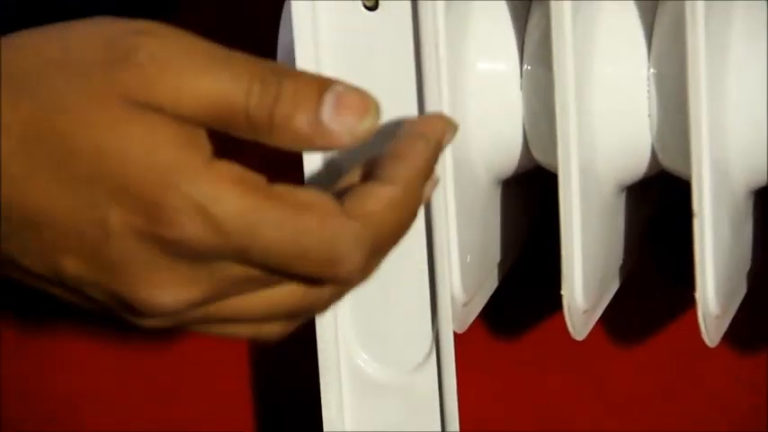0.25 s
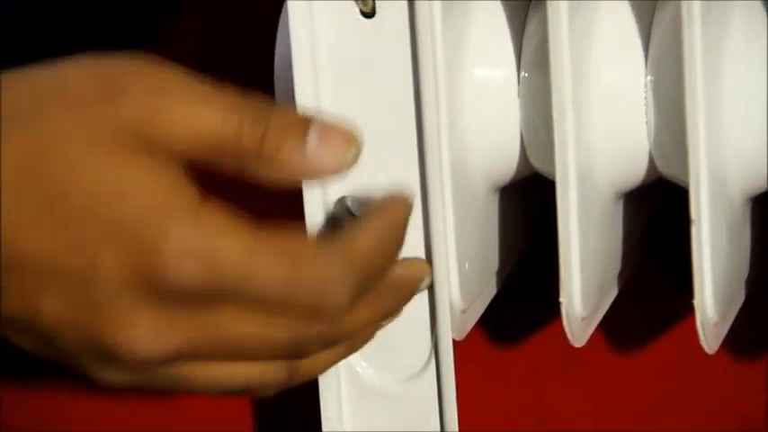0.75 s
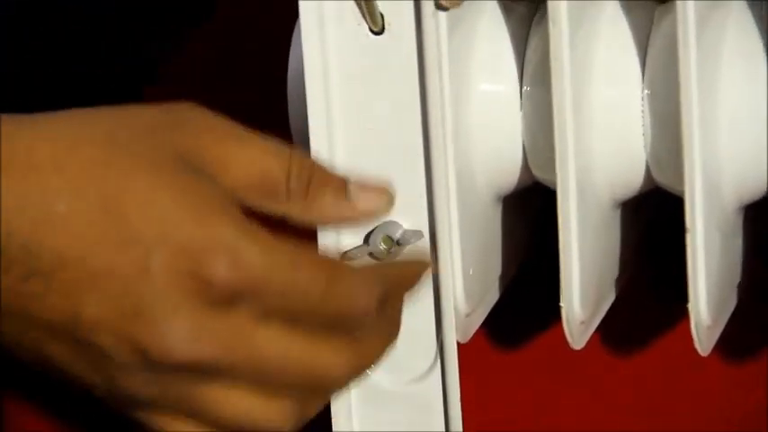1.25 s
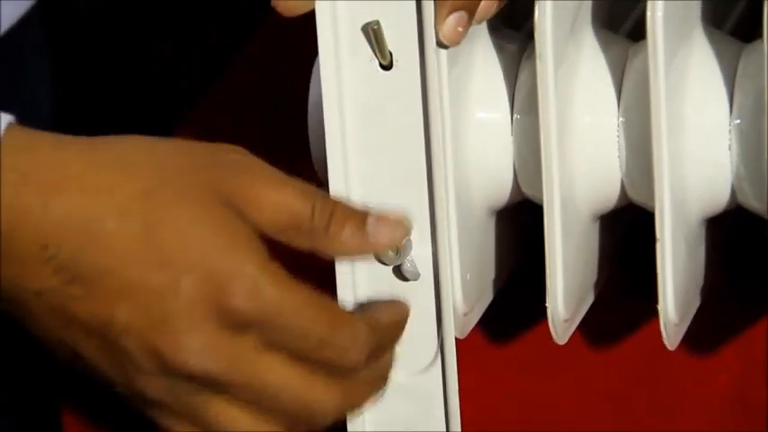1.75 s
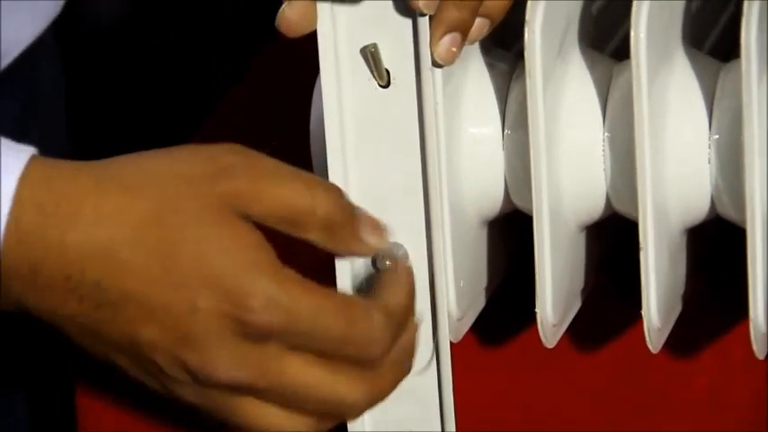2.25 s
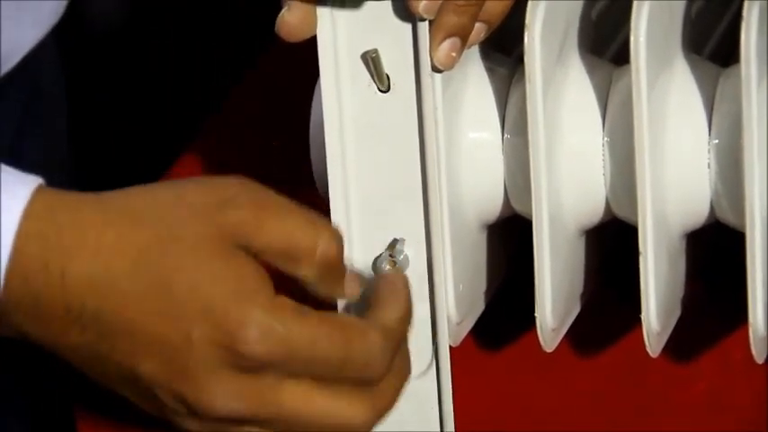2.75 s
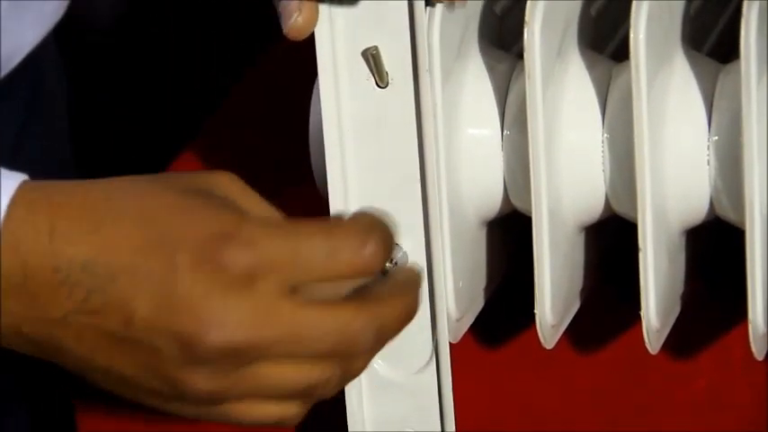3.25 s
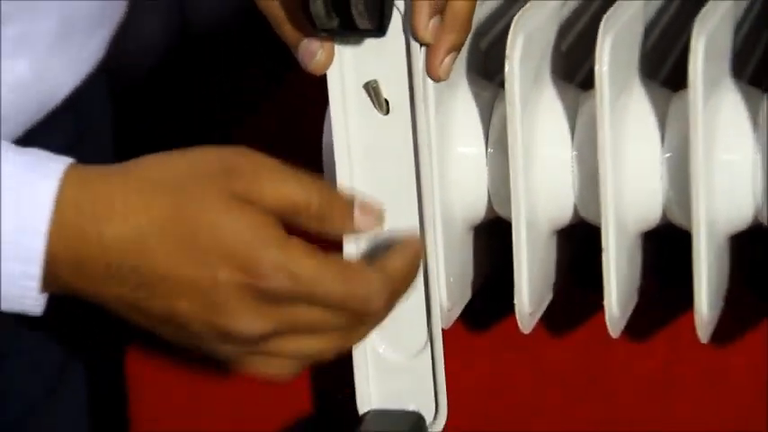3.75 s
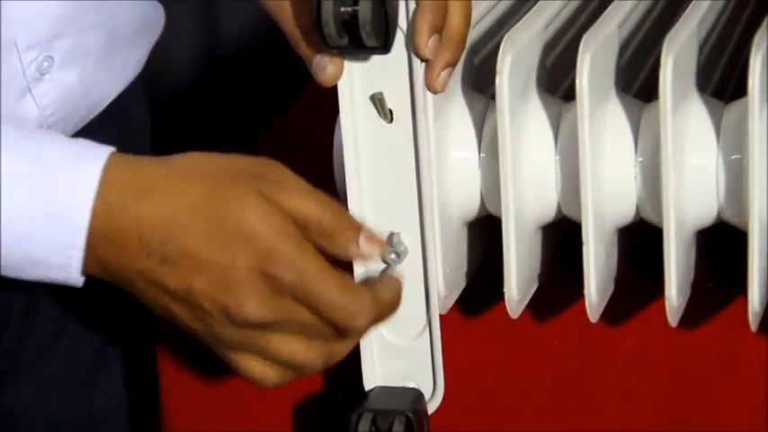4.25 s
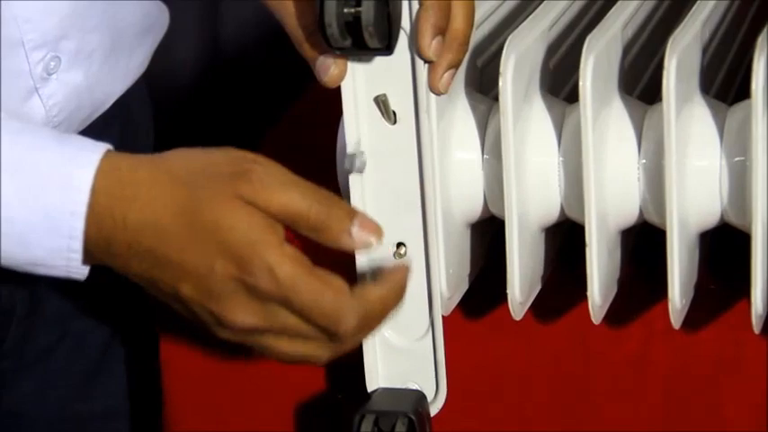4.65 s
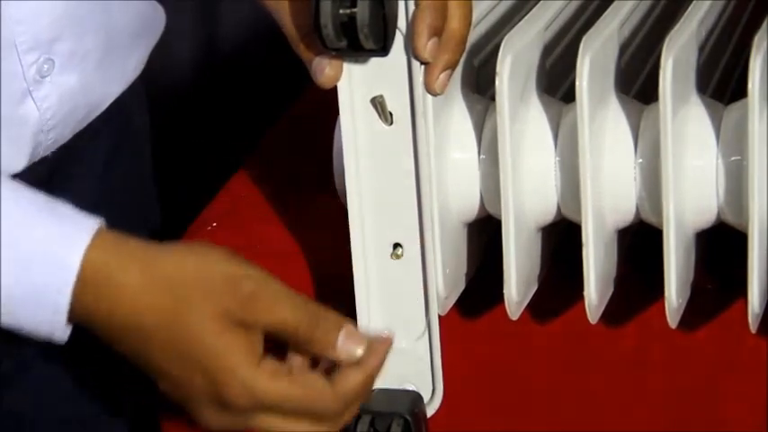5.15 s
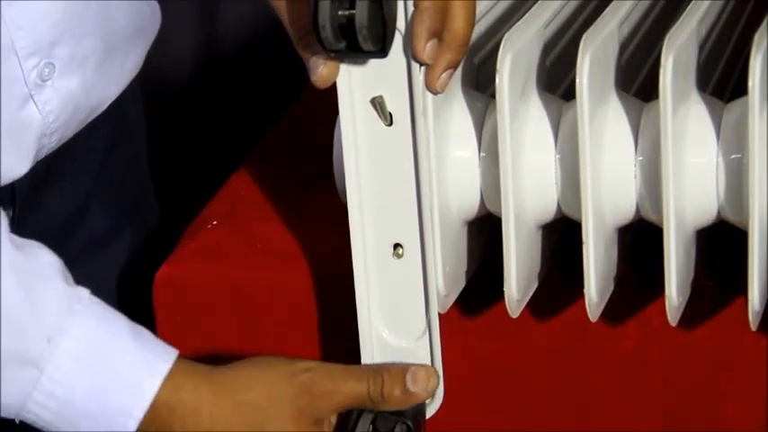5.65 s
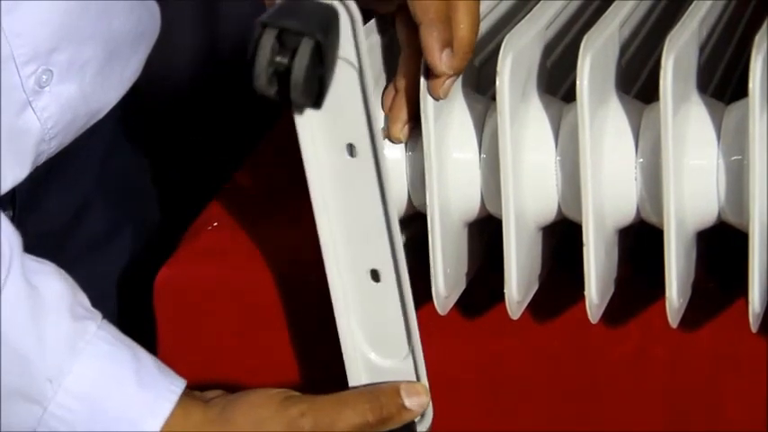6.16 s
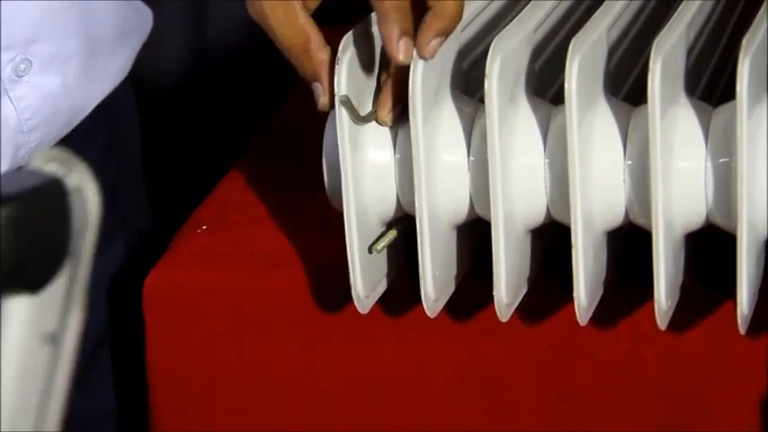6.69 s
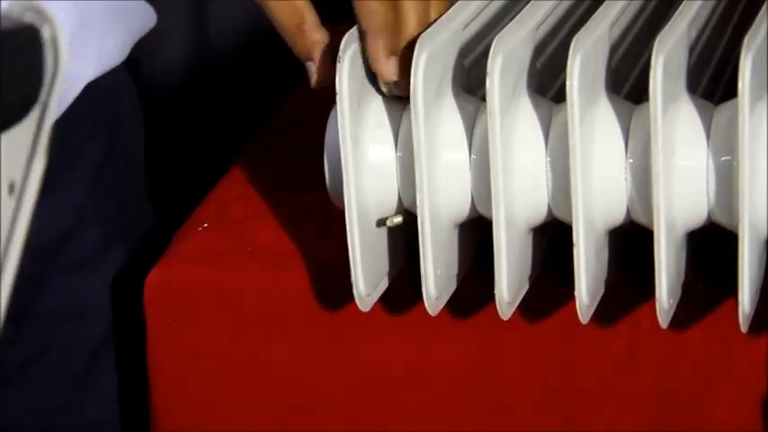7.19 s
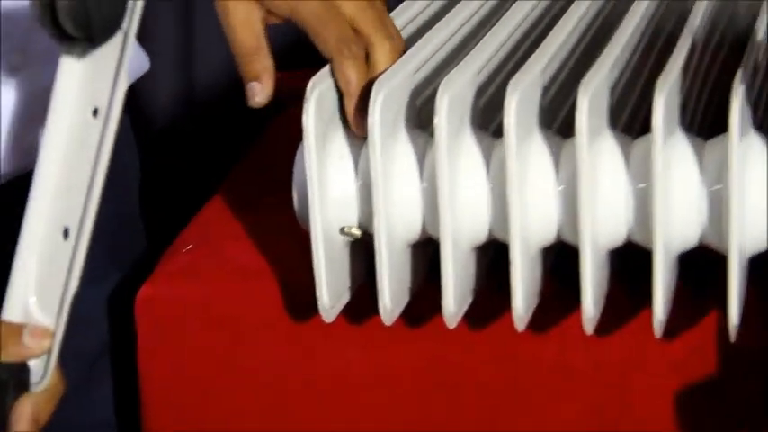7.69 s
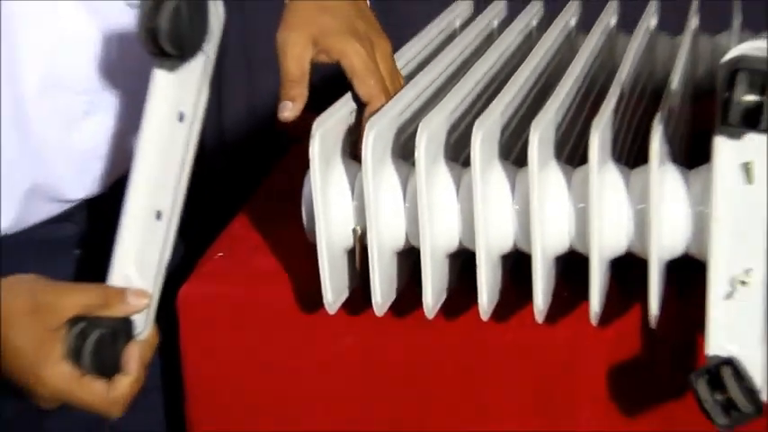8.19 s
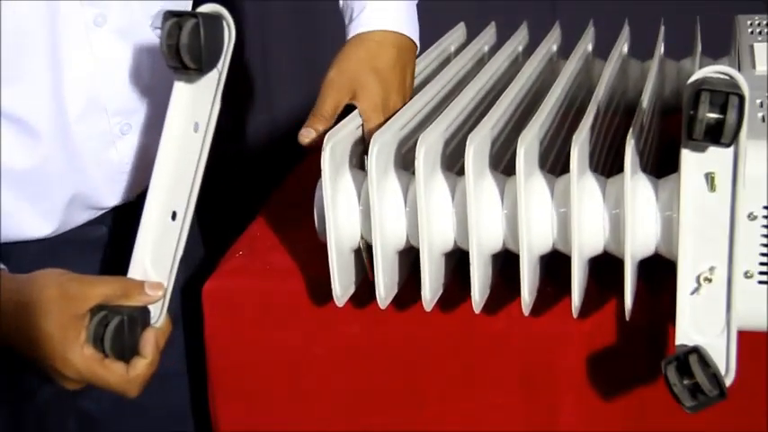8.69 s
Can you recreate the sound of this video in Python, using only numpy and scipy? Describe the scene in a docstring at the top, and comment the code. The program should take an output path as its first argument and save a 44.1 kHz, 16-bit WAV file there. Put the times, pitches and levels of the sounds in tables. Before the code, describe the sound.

Fingers spin a small metal nut along its thread: uneven, crisp tinny clicks with tiny rebounds, little bass, and soft low bumps of the radiator. It comes off with a sharp hiss-like rasp. Then a plate clacks and scrapes loose, cloth rustles, close dry knocks sound, and a hook strikes hollow steel fins. Close microphone, faint room noise, short indoor reverberation.

```python
"""In a small room, a wing nut is flicked round and off the hook bolt on the wheel plate of an oil-filled radiator.
Each flick makes the loose nut click on thread and plate: a noise crack, a noise shimmer and decaying sine modes.
The plate slides off and the freed hook clatters between the steel fins, built from blows and grainy scrapes.
A few dry knocks sound close by. Soft bumps, squeals, skin hisses, noise swells, still air and reverberation fill in."""
import sys
import numpy as np
from scipy import signal
from scipy.fft import rfft, irfft, next_fast_len
from scipy.io import wavfile
from scipy.ndimage import uniform_filter1d

SR = 44100
rng = np.random.default_rng(int(sys.argv[2]) if len(sys.argv) > 2 else 0)


def dump(signal):
    """Clip the signal to [-1, 1] and save it as 16-bit WAV at the path in sys.argv[1]."""
    limited = np.clip(np.atleast_2d(signal).T, -1, 1)
    pcm = np.round(limited * 32767).astype(np.int16)
    wavfile.write(sys.argv[1], SR, pcm)


N = 393813
CLOCK = np.arange(N) / SR        # time in the whole scene, s
AGE = np.arange(16384) / SR      # time since one blow, s

# a finger flicks the nut round: [t/s, level/dB, brightness/(dB per octave), f/Hz that the contact favours,
# first touch to blow/s, time between rebounds/s, loss at the first rebound/dB]
FLICKS = [(0.1986, -23, -2.5, 1300, 0.0021, .027, 15), (0.4909, -15, -0.2, 2090, 0.0063, .0087, -0.5),
          (0.7513, -13.5, 0.5, 5270, 0.015, .012, 10.5), (1.0984, -16, 2.6, 7030, 0.0034, .01, 27),
          (1.309, -14.5, -0.5, 2360, 0.0091, 0.019, 1), (1.5669, -14, 1, 2080, 0.00096, .028, 8),
          (1.8493, -17, 0, 1270, 0.019, .01, 17), (2.1192, -13.5, -0.1, 2270, 0.025, 0.027, 5),
          (2.4056, -12.5, 0.5, 2410, 0.024, .01, 19), (2.658, -11, 0.7, 2230, .02, .0096, 5),
          (2.9033, -15, 0.8, 2140, 0.0018, .01, 33), (3.2508, -22.5, 0.5, 8400, 0.00083, .01, 11),
          (3.5135, -18.5, 1.5, 1600, .005, .01, 15), (3.5683, -15.5, 0.5, 8000, 0.024, .01, 31),
          (3.8073, -16.5, 2, 5900, .0126, .021, 16), (4.328, -16, 2.5, 10100, 0.033, 0.0055, 5.5),
          (4.5739, -19, 1.5, 4300, 0.017, 0.0043, -0.5), (4.8339, -17.5, 1.4, 4470, .026, .017, 5)]
# colour of skin and cloth noise: [f/Hz, level/dB]
CLOTH_COLOUR = [(300, -9), (1000, 5.5), (6000, -2.5), (13000, -7.5), (16000, -26)]
# against a firm blow, harder ones are brighter (dB per octave, per dB) and ring less for their level (dB per dB)
FIRM_DB, BRIGHTER_PER_DB, RING_LOSS_PER_DB = -18.5, 0.2656, 0.1466


def from_db(db):
    """Turn decibels into gain."""
    return 10 ** (np.asarray(db) / 20)


def rms_one(x):
    """Scale to unit rms, the usual measure of average strength."""
    return x / np.sqrt(np.mean(x ** 2) + 1e-20)


def attack_one(x, count=353):
    """Scale so that the first 8 ms have unit rms."""
    return x / np.sqrt(np.mean(x[:count] ** 2) + 1e-20)


def at_hz(points, hz):
    """Read a table on a log-frequency axis, as hearing spaces pitch."""
    points = np.array(points)
    return np.interp(np.log(hz + 1), np.log(points[:, 0]), points[:, 1])


def fade(t60, age=AGE):
    """Die away exponentially: 60 dB down after t60 seconds."""
    return np.exp(-np.log(1000) * age / t60)


def add(track, s, sound):
    """Mix a sound into a track at time s."""
    start = max(round(s * SR), 0)
    track[start:start + len(sound)] += sound[:N - start]


def level(curve):
    """Gain that follows a curve of [t/s, level/dB], silent outside it."""
    return from_db(np.interp(CLOCK, *np.transpose(curve), left=-np.inf, right=-np.inf))


def swells(rows):
    """Gain of soft strokes that rise and fall evenly about their moments: [t/s, level/dB, width/s]."""
    return sum(from_db(db) * np.exp(-2 * ((CLOCK - s) / width) ** 2) for s, db, width in rows)


def dying(rows):
    """Gain of sounds that start at once and die away: [t/s, level/dB, t60/s]."""
    return sum(from_db(db) * fade(t60, np.abs(CLOCK - s)) * (CLOCK >= s) for s, db, t60 in rows)


def high_pass(x, hz):
    """Small steel parts radiate little bass."""
    return signal.sosfilt(signal.butter(2, hz, "high", fs=SR, output="sos"), x)


def favour(hz, favoured_hz, boost_db, octaves):
    """Boost in dB of the frequencies that one point of contact drives best."""
    distance = np.log2((hz + 1) / favoured_hz) / octaves
    return boost_db * np.exp(-.5 * distance ** 2)


def coloured(x, spectrum, tilt_db=0, peaks=()):
    """Filter by a spectrum, a tilt in dB per octave and peaks of (Hz, dB, octaves), with no sound before its cause."""
    size = next_fast_len(len(x), True)
    hz = np.fft.rfftfreq(size, 1 / SR)
    db = at_hz(spectrum, hz) + tilt_db * np.log2(np.clip(hz, 700, 14000) / 3000)
    db = db + sum(favour(hz, *peak) for peak in peaks)
    # folding the cepstrum gives the minimum-phase filter, which reacts as early as possible
    cepstrum = irfft(np.log(from_db(db)), size)
    cepstrum[1:size // 2] *= 2
    cepstrum[size // 2 + 1:] = 0
    response = np.exp(rfft(cepstrum))
    return irfft(rfft(x, size) * response, size)[:len(x)]


def resonant(spectrum, modes, lift_db, width_hz):
    """Lift a part's spectrum round each of its clear modes."""
    hz = np.geomspace(40, 18000, 1200)
    distance = (hz[:, None] - np.array(modes)[:, 0]) / width_hz
    nearness = np.exp(-.5 * distance ** 2).max(axis=1)
    return np.column_stack([hz, at_hz(spectrum, hz) + lift_db * nearness])


def ringing(modes, tilt_db=0, favoured_hz=None, spread_db=3.0):
    """Sum dying sines; each blow weights the modes anew, and the grip shifts their pitch a little."""
    hz, db, t60 = np.transpose(modes)
    weight, shift, sign = rng.standard_normal((3, len(hz)))
    db = db + tilt_db * np.log2(hz) + spread_db * weight
    if favoured_hz:   # high modes depend most on the point of contact
        boost_db = favour(hz, favoured_hz, boost_db=17.5, octaves=0.14)
        db = db + boost_db * np.clip(hz / 6000, 0, 1) ** 0.18
    phase = np.outer(2 * np.pi * hz * (1 + 0.0022 * shift), AGE).astype(np.float32)
    waves = np.sin(phase) * fade(t60[:, None].astype(np.float32), AGE.astype(np.float32))
    return attack_one((from_db(db) * np.sign(sign)) @ waves)


def brightened(hits, tilt_db):
    """Give each blow its brightness: the harder it lands, the shorter the contact."""
    s, db, ring_db, favoured_hz = np.transpose(hits)
    tilt_db = tilt_db + BRIGHTER_PER_DB * (db - FIRM_DB)
    return np.column_stack([s, db, tilt_db, ring_db, favoured_hz])


def strikes(hits, spectrum, modes, edge_hz, crack_t60, crack_tilt_db, body_t60, body_db, modes_db, spread_db):
    """Blows on one part: a brief crack, the dying shimmer of its crowded modes, and its clear modes."""
    out = np.zeros(N)
    spectrum = resonant(spectrum, modes, lift_db=1.5, width_hz=490)
    crack_boost_db, body_boost_db = 6.0, 2.5   # at the favoured pitch
    for (s, db, tilt_db, ring_db, favoured_hz), edge in zip(hits, np.broadcast_to(edge_hz, len(hits))):
        crack, body = rng.standard_normal((2, len(AGE)))
        crack_peak = (favoured_hz, crack_boost_db, .08)
        crack = coloured(crack * fade(crack_t60), spectrum, tilt_db + crack_tilt_db, [crack_peak])
        body_peak = (favoured_hz, body_boost_db, .08)
        body = coloured(body * fade(body_t60), spectrum, tilt_db, [body_peak])
        blow = attack_one(crack + from_db(body_db + ring_db) * body)
        blow = blow + from_db(modes_db + ring_db) * ringing(modes, tilt_db, favoured_hz, spread_db)
        add(out, s, from_db(db) * high_pass(blow, edge))
    return out


def slips(per_s, spread_db):
    """Tiny slips at random moments and of uneven size, as clicks of either sign."""
    happens = rng.random(N) < per_s / SR
    return happens * rng.choice([-1, 1], N) * from_db(spread_db * rng.standard_normal(N))


def slide(curve, spectrum, modes, per_s, sing_db):
    """Steel sticks and slips on steel: a grainy scrape that makes the clear modes sing."""
    drive = slips(per_s, spread_db=4)
    sing = rms_one(signal.fftconvolve(drive, ringing(modes))[:N])
    scrape = rms_one(coloured(drive, spectrum))
    return level(curve) * (scrape + from_db(sing_db) * sing)


def room(x, build_s):
    """Diffuse reflections build up quickly and die sooner in the treble."""
    # reverberation time: [f/Hz, t60/s]
    room_t60 = [(200, 0.94), (1000, 0.55), (2500, 0.56), (6000, 0.44), (10000, 0.3), (15000, 0.2)]
    age = np.arange(SR) / SR
    hz = np.fft.rfftfreq(SR, 1 / SR)
    white = np.exp(2j * np.pi * rng.random(len(hz)))
    tail = 0
    edges = np.geomspace(100, 18000, 13)
    for low, high in zip(edges, edges[1:]):
        band = irfft(white * (hz >= low) * (hz < high))
        tail = tail + band * fade(at_hz(room_t60, np.sqrt(low * high)), age)
    tail = tail * (1 - np.exp(-age / build_s))
    return signal.fftconvolve(x, tail / np.linalg.norm(tail))[:N]


def still_air():
    """Steady, faint room noise: random noise with a fixed colour."""
    # colour of the still room: [f/Hz, level/dB]
    air_colour = [(15, -57), (25, -21.5), (130, -3.5), (223, -5), (242, -3.5), (285, -1.5), (451, -11.5),
                  (1040, -16), (1400, -20), (3520, -26.5), (3820, -28.5), (5880, -27), (7510, -30),
                  (11300, -28.5), (16000, -37.5)]
    return from_db(-50) * rms_one(coloured(rng.standard_normal(N), air_colour))


def soft_noise():
    """Many tiny random clicks, coloured and swelling softly: a click's dying tail, then rustling sleeves."""
    # soft noise swells: the first is the dying tail of an earlier click, the later ones are rustling sleeves:
    # [t/s, level/dB, width/s]
    noise_swells = [(0, -46, 0.07), (5.85, -61, 0.59), (6.85, -55, .3), (8.2, -50.5, 0.47),
                    (8.9, -49.5, 0.36)]
    return swells(noise_swells) * rms_one(coloured(slips(per_s=2200, spread_db=-0.5), CLOTH_COLOUR))


def brushes():
    """Skin on paint: short, thin hisses."""
    # fingers brush the fins: [t/s, level/dB, width/s]
    strokes = [(7.098, -51, 0.02), (7.463, -52, .015), (7.79, -60, 0.01), (7.86, -49.5, 0.026)]
    hiss = coloured(rng.standard_normal(N), CLOTH_COLOUR, tilt_db=3.0, peaks=[(11000, 7, 0.24)])
    return swells(strokes) * rms_one(hiss)


def bumps():
    """Soft contacts stir only the low modes of the radiator."""
    # hands bump the radiator: [t/s, level/dB, t60/s]
    contacts = [(1.066, -33, 0.041), (1.244, -35.5, 0.071), (1.378, -38.5, 0.12), (2.041, -35.5, 0.077),
                (2.656, -31.5, 0.089), (3.563, -37, 0.25), (3.624, -33, 0.14), (4.31, -39.5, 0.12),
                (6.152, -36.5, 0.24), (7.843, -39, .06), (8.42, -35, 0.34), (8.454, -37, 0.21)]
    # colour of the thud: [f/Hz, level/dB]
    thud_colour = [(40, -21), (120, -6.5), (220, 5.5), (400, -2), (800, -8), (2000, -64)]
    # low modes of the whole radiator: [f/Hz, level/dB, t60/s]
    low_modes = [(185, 1, 0.23), (220, -7, .25), (266, -10, 0.41), (292, -9, 0.33)]
    out = np.zeros(N)
    for s, db, t60 in contacts:
        thud = rms_one(coloured(rng.standard_normal(len(AGE)), thud_colour))
        bump = from_db(-2) * thud + from_db(-10.5) * ringing(low_modes)
        soft_start = 1 - fade(0.0049)
        add(out, s, from_db(db) * bump * fade(t60) * soft_start)
    return out


def squeals(waver):
    """Stick and slip lock onto one pitch that glides and wavers with the pressure."""
    # steel squeals as it slides: [start t/s, end t/s, start f/Hz, end f/Hz, level/dB]
    glides = [(6.053, 6.108, 2110, 2030, -40), (6.07, 6.125, 2370, 2320, -56),
              (6.046, 6.11, 2790, 2850, -53), (6.08, 6.129, 5170, 5420, -38),
              (8.005, 8.089, 4720, 4660, -33), (8.006, 8.06, 5240, 5450, -30)]
    out = np.zeros(N)
    for start, end, from_hz, to_hz, db in glides:
        count = max(round((end - start) * SR), 100)
        unsteady = rms_one(uniform_filter1d(rng.standard_normal(count), size=130))
        hz = np.linspace(from_hz, to_hz, count) * (1 + waver * unsteady)
        tone = np.sin(2 * np.pi * np.cumsum(hz) / SR)
        add(out, start, from_db(db) * tone * signal.windows.tukey(count, .5))
    return out


def near_knocks():
    """Dry knocks close by: short cracks with a brief hollow ring."""
    # knocks: [t/s, level/dB, brightness/(dB per octave), ring/dB, favoured f/Hz]
    knocks = [(0.0575, -27.5, -6.5, -1.5, 357), (7.5283, -30.5, -1.5, -3, 970),
              (7.5478, -23, 2.5, -0.5, 5020), (7.7269, -15, -1, 1, 1115)]
    # colour of the crowded modes: [f/Hz, level/dB]
    knock_colour = [(60, -54), (160, -10), (500, -2.5), (900, -5.5), (1250, -17), (1700, -12.5),
                    (3500, -10), (4300, -12.5), (5600, -20), (10000, -12), (16000, -33)]
    # hollow ring: [f/Hz, level/dB, t60/s]
    knock_modes = [(222, -14.5, 0.058), (310, -29, 0.054), (524, -15, 0.052), (992, -11, 0.044),
                   (1630, 2, 0.012), (2460, -12.5, 0.043), (3260, 4, 0.0073), (5630, 1.5, 0.0068)]
    return strikes(knocks, knock_colour, knock_modes, edge_hz=280, crack_t60=0.0032, crack_tilt_db=-0.2,
                   body_t60=0.081, body_db=-22, modes_db=2.0, spread_db=2.0)


def falling_hook():
    """The freed hook strikes and scrapes the steel fins, which ring."""
    # blows on the fins: [t/s, level/dB, ring/dB, favoured f/Hz]
    hook_hits = [(7.962, -25.5, 1, 2070), (8.0076, -20.5, -2, 4640), (8.0951, -15.5, 7.5, 1130),
                 (8.1035, -21, 2.5, 544), (8.4203, -41, -19, 2570), (8.4287, -29, -4, 4770),
                 (8.6726, -14, 9, 5250), (8.6855, -15, 4.5, 6100), (8.8855, -37, -2, 2840)]
    # scrape along the fins: [t/s, level/dB]
    hook_slide = [(7.955, -82), (7.965, -43), (8.02, -38), (8.06, -40), (8.09, -36), (8.11, -76)]
    # colour of the crowded modes: [f/Hz, level/dB]
    fin_colour = [(120, -57), (200, -16), (424, -11), (482, -8), (529, -17), (590, -10), (1140, -4),
                  (1530, -8.5), (2380, -3.5), (6050, -9), (7830, -15), (9580, -12), (16000, -26.5)]
    # clear modes of hook and fins: [f/Hz, level/dB, t60/s]
    fin_modes = [(522, -17, 0.21), (1140, -0.5, 0.06), (1810, -2.5, 0.3), (2443, 11, 0.066),
                 (3200, -18, 0.25), (3440, -21, 0.22), (3780, -19, 0.18), (4677, -10, 0.17),
                 (4800, -1.5, 0.08), (5660, -14, 0.046), (6660, -14, .25), (9561, -16, 0.16)]
    blows = strikes(brightened(hook_hits, tilt_db=-1.42), fin_colour, fin_modes, edge_hz=170,
                    crack_t60=0.043, crack_tilt_db=7.0, body_t60=0.21, body_db=-8.0,
                    modes_db=-14.0, spread_db=-0.5)
    return blows + slide(hook_slide, fin_colour, fin_modes, per_s=670, sing_db=3)


def wheel_plate():
    """The plate knocks and scrapes as it is shifted and pulled off the bolt."""
    # blows: [t/s, level/dB, ring/dB, favoured f/Hz]
    plate_hits = [(5.231, -31.5, -2, 2820), (5.5112, -19, -20, 2110), (5.5177, -17.5, -6.5, 2040),
                  (5.9656, -34.5, 14.5, 4320), (6.0551, -38.5, 13, 2080), (6.129, -20, -2, 1190),
                  (6.1525, -25.5, 3, 2640), (6.1918, -26.5, 0, 1710), (6.2806, -37, -14, 3000),
                  (6.3314, -31.5, -9.5, 2770), (6.6335, -38.5, -3, 1040)]
    # scrape: [t/s, level/dB]
    plate_slide = [(6.03, -45.5), (6.06, -44), (6.11, -38), (6.16, -22), (6.21, -50), (6.25, -63),
                   (6.3, -80)]
    # colour of the crowded modes: [f/Hz, level/dB]
    plate_colour = [(180, -79), (300, -21), (537, -8), (593, -20), (749, -12.5), (1970, -6.5), (2400, 2.5),
                    (3640, -9.5), (5340, -11), (6000, -13), (11700, -14.5), (16000, -32)]
    # clear modes of the plate: [f/Hz, level/dB, t60/s]
    plate_modes = [(1690, 7, 0.31), (2105, 1, 0.32), (2420, -6, 0.21), (2820, -6, 0.18), (3280, 11, 0.32),
                   (3500, -11, .1), (4306, 7.5, 0.074), (5320, 19, 0.076), (6530, 11, 0.14),
                   (7440, 13, 0.11), (8450, -14, .1)]
    blows = strikes(brightened(plate_hits, tilt_db=-0.2), plate_colour, plate_modes, edge_hz=760,
                    crack_t60=0.015, crack_tilt_db=0.5, body_t60=0.18, body_db=-5.5,
                    modes_db=-14.0, spread_db=2.5)
    return blows + slide(plate_slide, plate_colour, plate_modes, per_s=1200, sing_db=-13.0)


def nut_clicks():
    """Each flick is a light touch, the blow and two rebounds; in between the nut rocks on its thread."""
    # the loose nut rocks: [t/s, level/dB, brightness/(dB per octave), favoured f/Hz]
    nut_rocks = [(0.2564, -19.5, -2, 4830), (0.2628, -30, 0, 8560), (0.5405, -21.5, 0.5, 1980),
                 (0.7386, -20, 0.5, 2240), (0.8539, -23.5, -2, 7560), (1.0189, -34, 0, 5000),
                 (1.0735, -22, -6, 5700), (1.6488, -31, 4.5, 1420), (1.9345, -23, 0, 9240),
                 (2.2265, -20, -0.7, 6200), (2.4812, -26, 4.5, 1230), (2.6058, -31, 2.5, 3320),
                 (2.7516, -18, 4, 6540), (3.0415, -37.5, 1.5, 2130), (3.0573, -27, -2.5, 1360),
                 (3.1578, -37.5, -2.5, 1460), (3.3697, -35, 2.5, 11700), (4.0215, -43.5, 0, 2240),
                 (4.3027, -28, 1, 2500), (4.3184, -22.5, 1, 6000), (4.6126, -23, 4.5, 3070),
                 (4.6464, -29, 4, 3350)]
    # touches and rebounds favour some pitch in this range: [lowest f/Hz, highest f/Hz]
    contact_hz = (1300, 7260)
    touch_db = -17.5          # first touch relative to the blow
    rebound_loss_db = 8.5     # further loss at the second rebound
    clicks = list(nut_rocks)
    contacts = np.exp(rng.uniform(*np.log(contact_hz), (len(FLICKS), 3)))
    for flick, (touch_hz, first_hz, second_hz) in zip(FLICKS, contacts):
        s, db, tilt_db, favoured_hz, lead, gap, loss_db = flick
        clicks += [(s - lead, db + touch_db, tilt_db, touch_hz),
                   (s, db, tilt_db, favoured_hz),
                   (s + gap, db - loss_db, tilt_db, first_hz),
                   (s + 2 * gap, db - loss_db - rebound_loss_db, tilt_db, second_hz)]
    s, db, tilt_db, favoured_hz = np.transpose(clicks)
    ring_db = RING_LOSS_PER_DB * (FIRM_DB - db)
    return brightened(np.column_stack([s, db, ring_db, favoured_hz]), tilt_db)


def wing_nut():
    """The nut clicks, chatters and grates along the bolt, loses bass near its end and skids off the thread."""
    # colour of the crowded modes: [f/Hz, level/dB]
    nut_colour = [(290, -29.5), (500, -19.5), (795, -18.5), (868, -10), (1250, -4), (1770, -7.5),
                  (2190, 1.5), (2570, -7), (3150, -5.5), (3750, -11.5), (4730, -3.5), (6900, -13.5),
                  (8450, -11), (11800, -19), (16000, -29)]
    # clear modes of nut and bolt: [f/Hz, level/dB, t60/s]
    nut_modes = [(963, -5.5, 0.23), (1296, -3.5, 0.26), (1660, -11, 0.6), (2086, -13, 0.047),
                 (2520, -32, 0.22), (3180, -9, 0.37), (4170, -18, 0.36), (4160, -3, 0.1), (4840, 1.5, 0.03),
                 (5000, -24, 0.084), (5400, -14, 0.13), (5640, 6, 0.037), (6475, 4.5, 0.14),
                 (7190, 4.5, 0.04), (7530, 4.5, 0.071), (7700, -13, 0.11), (8520, 6, 0.1), (9970, -2, 0.11),
                 (9600, -42.5, 0.12), (11600, 3.5, 0.08), (12700, -26, 0.11), (14298, -12, 0.1)]
    # the nut passes less bass to the plate near the end of the bolt: [t/s, low edge f/Hz]
    nut_edge = [(0, 640), (3.4, 624), (4.4, 1450)]
    # the nut grates on a dry stretch of thread: [t/s, level/dB, width/s]
    rasps = [(1.933, -28.5, .011), (2.168, -26, .012), (4.312, -28, 0.015), (4.581, -19, 0.01)]
    # the last turn of thread skids off the bolt: [t/s, level/dB, t60/s]
    thread_skids = [(4.5955, -13, .05), (4.6126, -31, .06), (4.6464, -29, .05)]
    # thin colour of a skid: [f/Hz, level/dB]
    skid_colour = [(3000, -35), (8000, -22), (12000, 7), (14500, 4), (16000, -5)]
    clicks = nut_clicks()
    edge_hz = np.interp(clicks[:, 0], *np.transpose(nut_edge))
    clicking = strikes(clicks, nut_colour, nut_modes, edge_hz, crack_t60=0.012, crack_tilt_db=-0.5,
                       body_t60=0.089, body_db=-9.5, modes_db=-8.0, spread_db=5.0)
    # after a flick the nut spins on and chatters, more softly than the blow
    spin_db, spin_t60_s = -22, .22
    spin = dying((s, db + spin_db, spin_t60_s) for s, db, *_ in FLICKS)
    chatter = coloured(slips(per_s=380, spread_db=1), nut_colour, tilt_db=-4.5)
    chatter = spin * rms_one(high_pass(chatter, hz=1100))
    rasp = coloured(slips(per_s=3000, spread_db=6), nut_colour, tilt_db=0.5)
    rasp = swells(rasps) * rms_one(high_pass(rasp, hz=1400))
    skid = dying(thread_skids) * rms_one(coloured(slips(per_s=4200, spread_db=6), skid_colour))
    return clicking + chatter + rasp + skid


def scene():
    """Nut, plate and hook sound into the room; the knocks are near and almost dry."""
    background = still_air() + soft_noise()
    handling = bumps() + squeals(waver=0.0075) + brushes()
    near = near_knocks()
    hook = falling_hook()
    plate = wheel_plate()
    nut = wing_nut()
    to_room = from_db(-10.5) * (nut + handling) + from_db(-12.0) * plate
    to_room = to_room + from_db(-7.0) * hook + from_db(-26) * near
    echo = room(to_room, build_s=0.00077)
    return (nut + plate + hook + near + handling + echo + background)[None]


def record(dry):
    """Round the highest peaks, then cut the treble above 16 kHz."""
    rounded = 1.3 * np.tanh(dry / 1.3)
    top_cut = signal.ellip(10, .2, 70, 16000, fs=SR, output="sos")
    return signal.sosfilt(top_cut, rounded)


dry = scene()
out = record(dry)
dump(out)
```